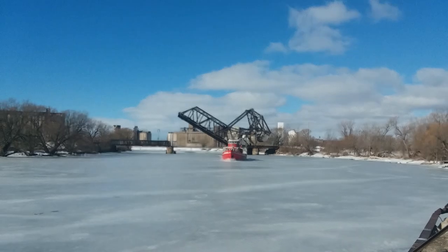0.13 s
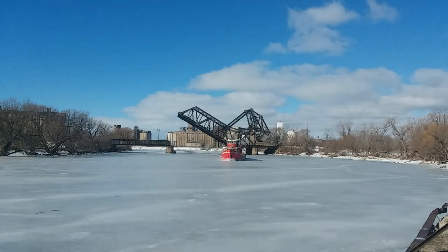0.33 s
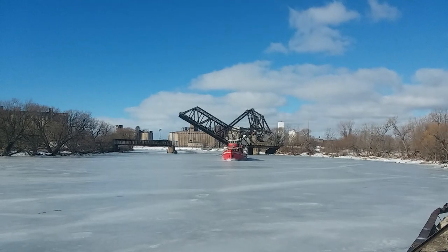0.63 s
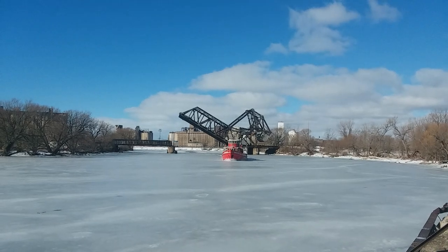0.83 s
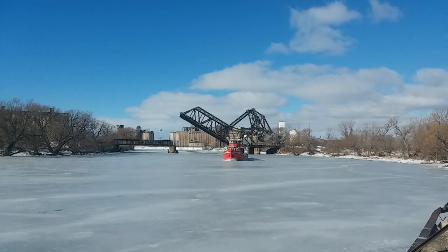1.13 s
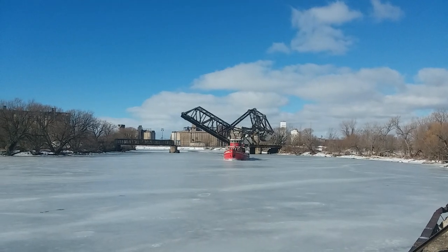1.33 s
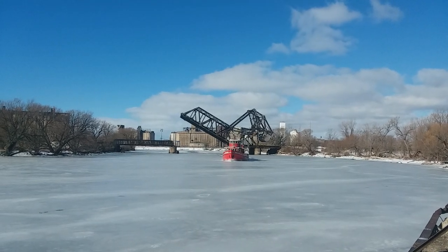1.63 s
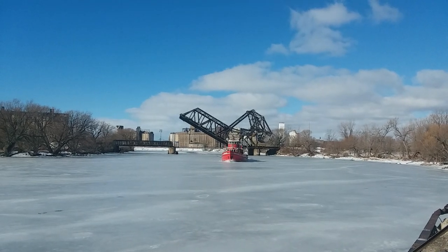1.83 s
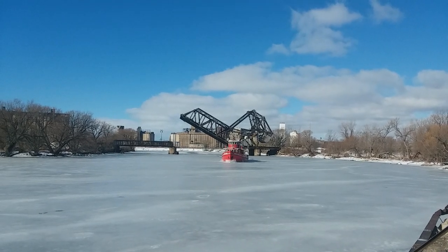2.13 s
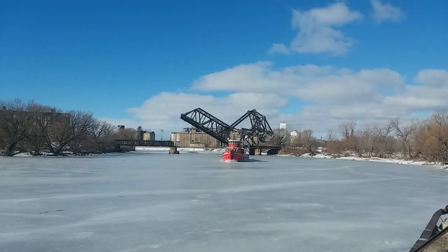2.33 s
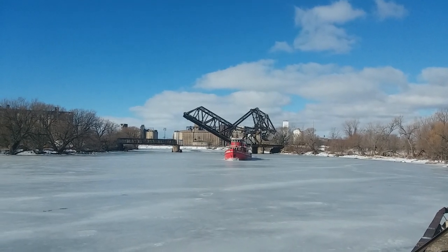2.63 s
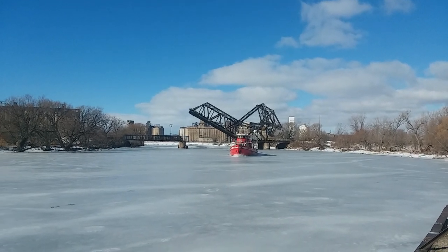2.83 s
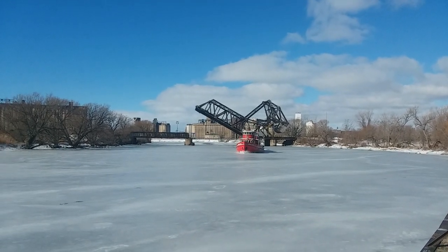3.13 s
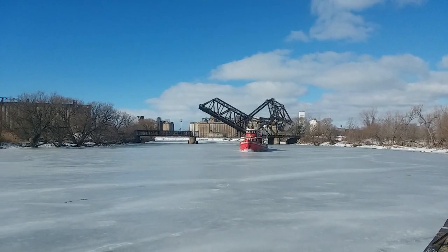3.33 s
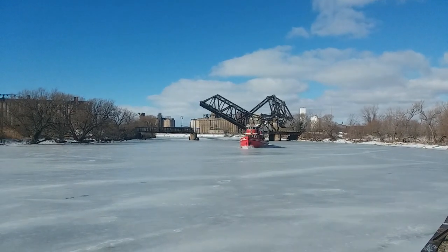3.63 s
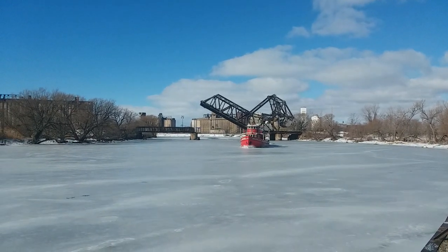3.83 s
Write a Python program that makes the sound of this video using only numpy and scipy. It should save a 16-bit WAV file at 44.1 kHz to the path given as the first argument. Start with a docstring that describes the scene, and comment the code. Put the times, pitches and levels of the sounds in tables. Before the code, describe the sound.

Distant boat engine roaring dully as it crunches through river ice, with wind thudding the microphone

```python
"""Boat pushing through river ice, in wind

A far boat is a dull roar of engine, wash and crunching ice: coloured noise with dense grains and a low thrum.
Small ice cracks are short wavelets. Boat and cracks reach two ports directly and by an inverted bounce off the ice.
Wind buffets the ports with lumpy low noise, mostly unlike in each, and with single low thuds.
Hiss and a faint whine lie beneath. The sound fades in after a short silence.
"""
import sys
import numpy as np
from scipy import signal
from scipy.fft import rfft, irfft
from scipy.io import wavfile

SR = 44100
rng = np.random.default_rng(int(sys.argv[2]) if len(sys.argv) > 2 else 0)


def rack_gain(trim_db):
    """Turn a fader trim in dB into the linear factor to multiply a signal by."""
    fader = np.asarray(trim_db, float)
    return 10 ** (fader / 20)


def generate_wav(signal):
    """Clip the signal to [-1, 1] and save it as 16-bit WAV at the path in sys.argv[1]."""
    frames = np.transpose(np.atleast_2d(signal))
    scaled = np.clip(frames, -1, 1) * 32767
    pcm = np.round(scaled).astype(np.int16)
    wavfile.write(sys.argv[1], SR, pcm)


N = 176400
LEFT_RIGHT = np.array([[1], [-1]])


def rms_one(x):
    """Scales to unit rms."""
    return x / np.sqrt(np.mean(x ** 2) + 1e-20)


def in_time(rows):
    """Columns of a table as curves over time."""
    time_s, *columns = np.transpose(rows)
    return [np.interp(np.arange(N) / SR, time_s, column) for column in columns]


def at_hz(points, hz):
    """Reads a table on a log-frequency axis."""
    point_hz, value = np.transpose(points)
    return np.interp(np.log(hz + 1e-3), np.log(point_hz), value)


def shaped(x, response):
    """Filters by a complex response on the FFT grid."""
    return irfft(rfft(x, axis=-1) * response, N, axis=-1)


def drift(corner_hz):
    """Slow random curve of unit rms: two-pole low-passed noise at SR / 40, interpolated."""
    pole = np.exp(-2 * np.pi * corner_hz * 40 / SR)
    noise = rng.standard_normal(N // 40 + 2002)
    slow = signal.lfilter([1], [1, -2 * pole, pole * pole], noise)[2000:]  # settled part
    return np.interp(np.arange(N) / 40, np.arange(len(slow)), rms_one(slow))


def blip(t, pitch_hz, spread_s, phase_turns):
    """A short wavelet: a sine under a Gaussian bell."""
    return np.exp(-.5 * (t / spread_s) ** 2) * np.sin(2 * np.pi * (pitch_hz * t + phase_turns))


def crunch_grains():
    """Crunching ice as dense random clicks of either sign, their density drifting."""
    median_per_s, spread_db = 500, 4
    chance = median_per_s * rack_gain(4 * drift(5)) / SR
    clicks = (rng.random(N) < chance) * rng.choice([-1, 1], N)
    return rms_one(clicks * rack_gain(spread_db * np.minimum(rng.exponential(1, N), 4)))


def boat_roar(hz):
    """Noise and crunch grains, mono plus a scattered pair; each octave swells with effort and flickers."""
    # effort against the ice: start_s, level_db (500-2800 Hz), bright_db, air_db (both used about their means)
    effort = [(0.62, -33, -28, -44.5), (0.85, -32, -24, -44), (0.88, -30, -30, -46), (0.97, -33, -28, -42),
              (1.1, -31, -30, -46), (1.12, -35, -25, -41.5), (1.37, -33.5, -27, -43.5),
              (1.94, -31.5, -21, -39), (2.01, -33.5, -21, -31), (2.03, -27.5, -25, -38),
              (2.06, -30, -22, -39), (2.41, -30.5, -25.5, -43), (2.42, -25, -29, -49),
              (2.44, -32, -25, -40.5), (2.49, -30.5, -20, -38.5), (2.83, -32.5, -25.5, -41),
              (2.94, -27.5, -27, -43), (3.06, -33.5, -21.5, -37), (3.08, -28.5, -24.5, -40.5),
              (3.35, -32.5, -27.5, -40), (3.42, -32.5, -23, -36.5), (3.44, -27.5, -29.5, -42),
              (3.48, -28, -28, -39), (3.56, -24, -27, -41), (3.6, -31, -26, -38.5), (3.9, -32, -24, -36),
              (3.96, -31.5, -26.5, -39), (3.97, -30.5, -22.5, -42)]
    # colour after distance and microphone: pitch_hz, density_db (relative, per Hz)
    roar_colour = [(60, -15.5), (150, 2), (310, -6), (450, 1.5), (800, -7), (1400, -11), (2050, -12.5),
                   (2600, -19), (3000, -32), (3200, -33), (3400, -34.5), (3700, -27.5), (4050, -36),
                   (4300, -34), (4900, -42), (5400, -49.5), (6100, -51), (7000, -50.5), (8200, -51),
                   (8500, -58.5), (8850, -58), (9100, -68), (10500, -71.5), (12000, -70), (13500, -71)]
    # scattered part, unlike in each port: pitch_hz, level_db (relative to the mono part)
    scatter = [(300, -18), (550, -19.5), (1200, -8.5), (2500, -10.5), (3200, -6.5), (4500, -5), (8000, -1)]
    crunch_db, flutter_db, patchy_db = -6.5, 0.74, 0.97
    bright_from_hz, bright_share, air_from_hz, air_share = 2570, 0.88, 6400, 1.08

    level_db, bright_db, air_db = in_time(effort)
    bright_swing_db = bright_share * (bright_db - bright_db.mean())
    air_swing_db = air_share * (air_db - air_db.mean())
    grains = crunch_grains()
    raw = rng.standard_normal((3, N))
    raw[0] += rack_gain(crunch_db) * grains
    spectrum = rfft(raw, axis=-1) * rack_gain(at_hz(roar_colour, hz))
    spectrum[1:] *= rack_gain(at_hz(scatter, hz))
    mid_rms = np.sqrt(np.mean(irfft(spectrum[0] * (hz > 500) * (hz < 2800), N) ** 2))

    octave = np.log2((hz + 1) / 125)
    flutter = flutter_db * drift(14)  # shared by all octaves
    out = 0
    for k in range(8):
        band = np.cos(np.pi / 2 * np.clip(np.maximum(octave, 0) - k, -1, 1)) ** 2
        from_octave = np.log2(np.array([bright_from_hz, air_from_hz]) / 125)
        bright, airy = np.clip(k + 1 - from_octave, 0, 1)
        lift_db = (bright - airy) * bright_swing_db + airy * air_swing_db
        gain = rack_gain(lift_db + flutter + patchy_db * drift(4.4))
        out = out + irfft(spectrum * band, N, axis=-1) * gain
    return out / mid_rms * rack_gain(level_db)


def engine_thrum(hz):
    """Low engine thrum: noise through one smooth resonant band."""
    # start_s, level_db (before gain_db)
    thrum_level = [(0.62, -28), (0.75, -35), (0.9, -20), (0.98, -34.5), (1.11, -23), (1.14, -36),
                   (1.45, -30), (1.55, -40.5), (1.61, -32.5), (2.55, -30.5), (2.8, -42.5), (2.98, -18),
                   (3.24, -34.5), (3.4, -23.5), (3.69, -34), (3.97, -27.5)]
    centre_hz, width_hz, gain_db = 201.8, 107, -3
    response = 1 / (1 + ((hz - centre_hz) / (width_hz / 2)) ** 4)
    thrum = shaped(rng.standard_normal(N), response)
    return rms_one(thrum) * rack_gain(in_time(thrum_level)[0] + gain_db)


def wind_buffeting(hz):
    """Turbulence at the ports: lumpy low noise, mostly its own in each."""
    # start_s, level_db (before gain_db), left_over_right_db
    wind_level = [(0.62, -35, 5.5), (0.81, -35, 0.0), (1.19, -40, -3), (1.21, -29, -10), (1.27, -32, 0),
                  (1.37, -42.5, 2), (1.65, -33.5, 1.5), (1.69, -30.5, 24), (1.77, -34.5, -7),
                  (2.0, -33.5, 22), (2.05, -32, 7), (2.73, -36, -0.5), (3.24, -33, 4), (3.97, -37.5, -2)]
    # pitch_hz, density_db (relative, per Hz)
    buffet_colour = [(25, -39.5), (40, -26), (65, 3), (100, 2), (160, -1.5), (230, -6.5), (320, -9.5),
                     (450, -34.5), (900, -57), (2000, -120)]
    lumps_db, lumps_hz, gain_db, alike = 3, 18, 5.5, 0.37  # alike: shared share of power
    level_db, pan_db = in_time(wind_level)
    noise = rng.standard_normal((3, N))
    noise = np.sqrt(1 - alike) * noise[:2] + np.sqrt(alike) * noise[2]
    lumps = np.array([drift(lumps_hz), drift(lumps_hz)])
    out = rms_one(shaped(noise * rack_gain(lumps_db * lumps), rack_gain(at_hz(buffet_colour, hz))))
    return out * rack_gain(level_db + gain_db + pan_db / 2 * LEFT_RIGHT)


def self_noise(shape):
    """Steady white hiss in each port and a faint sine whine in both."""
    hiss_db, whine_db, whine_hz = -76, -97, 14000
    t = np.arange(N) / SR
    hiss = rack_gain(hiss_db) * rng.standard_normal(shape)
    return hiss + rack_gain(whine_db) * np.sin(2 * np.pi * whine_hz * t)


def ice_cracks():
    """Loudest ice cracks: wavelets under a bell far shorter than one cycle-pair."""
    # start_s, level_db (of the bell, before the paths to the ports)
    cracks = [(0.593, -22), (0.718, -16.5), (0.728, -22), (0.742, -18), (0.756, -19), (0.772, -18.5),
              (1.595, -20), (1.776, -14), (2.025, -13.5), (2.417, -19.5), (2.56, -17), (2.677, -15.5),
              (2.706, -21), (3.711, -26)]
    pitch_hz, spread_s, centre_s = 1050, .0004, .0015
    out = np.zeros(N)
    t = np.arange(400) / SR
    for start_s, level_db in cracks:
        i = int(start_s * SR)
        out[i:i + 400] += rack_gain(level_db) * blip(t - centre_s, pitch_hz, spread_s, -0.18)
    return out


def river_paths(direct, scattered, hz):
    """Direct path minus a delayed bounce off the ice; each port adds its own colour and phase."""
    # pitch_hz, left_over_right_db
    port_colour = [(300, 0.5), (600, -1.4), (1000, -1.5), (1700, -4), (2300, -3), (3000, -4.5), (3600, 1),
                   (4100, -2), (4700, 9), (5300, 14), (6000, -6), (7000, 2), (8500, 0), (10000, -4),
                   (12000, 15), (14500, 6)]
    # pitch_hz, left_lead_rad
    port_lead = [(300, 0.0), (2700, 0.05), (3200, 1.1), (4200, 1.6), (5000, 3.9), (6000, 3.3), (6800, 6.6),
                 (9000, 5.4)]
    # pitch_hz, bounce_share (of the direct amplitude)
    bounce_share = [(500, 0.027), (1200, 0.05), (2300, 0.37), (4000, 0.28), (6000, 0.29), (9000, .2)]
    delay_s = 0.001726 + LEFT_RIGHT * .00002
    paths = 1 - at_hz(bounce_share, hz) * np.exp(-2j * np.pi * hz * delay_s)
    port = rack_gain(LEFT_RIGHT * at_hz(port_colour, hz) / 2)
    lead = np.exp(.5j * LEFT_RIGHT * at_hz(port_lead, hz))
    return shaped(direct, paths * port * lead) + shaped(scattered, port)


def wind_thuds():
    """Strongest wind thuds: low wavelets of a cycle or two, panned between the ports."""
    # centre_s, level_db (of the bell, before gain_db), port (0 left to 1 right), pitch_hz
    thuds = [(1.219, -11, 1, 139), (1.394, -10, 0.87, 151), (1.628, -11, 0, 147), (1.693, -1, 0, 166),
             (1.75, -5.5, 0, 182), (1.76, -10.5, 0.95, 101), (1.887, -7, 0.046, 153), (1.953, -5.5, 0, 164),
             (2.017, -2, 0.1, 186), (2.101, -7.5, 0, 142), (2.291, -4.5, 0.53, 195),
             (2.375, -10.5, 0.36, 136), (2.521, -6, 0.034, 183), (2.971, -6.5, 0.53, 200),
             (3.003, -10, 0.51, 208), (3.016, -19, 0.52, 198), (3.12, -9.5, 0.97, 132),
             (3.176, -10, 0, 198), (3.252, -9, 1, 99), (3.256, -4.5, 0, 114), (3.319, -8, 0.043, 154),
             (3.339, -5, 0.77, 130), (3.452, -5.5, 0.14, 187), (3.491, -13, 1, 175),
             (3.583, -10, 0.55, 206)]
    spread_cycles, gain_db = 0.55, -4
    out = np.zeros((2, N))
    t = np.arange(-1200, 1200) / SR
    for (centre_s, level_db, port, pitch_hz), turns in zip(thuds, rng.random(len(thuds))):
        i = int(centre_s * SR)
        thud = blip(t, pitch_hz, spread_cycles / pitch_hz, turns)
        out[:, i - 1200:i + 1200] += rack_gain(level_db + gain_db) * thud * [[1 - port], [port]]
    return out


def scene():
    """Boat and ice across the river plus wind on the ports."""
    hz = np.arange(N // 2 + 1) * SR / N
    roar = boat_roar(hz)
    direct = roar[0] + engine_thrum(hz) + ice_cracks()
    return river_paths(direct, roar[1:], hz) + wind_buffeting(hz) + wind_thuds()


def low_pass(x):
    """Removes everything above the highest recorded frequency."""
    return signal.sosfilt(signal.butter(12, 15720, fs=SR, output="sos"), x)


def record(dry):
    """Cuts the deepest rumble, adds self-noise and fades in from silence."""
    # start_s, gain_db
    fade_in = [(.369, -45), (.376, -32.5), (.39, -17), (.41, -15), (.44, -8), (.54, -5.5), (.56, -1),
               (.62, 1)]
    start_s, low_cut_hz = .369, 47.4
    high_pass = signal.butter(4, low_cut_hz, "high", fs=SR, output="sos")
    mix = signal.sosfilt(high_pass, dry) + self_noise(dry.shape)
    fade = rack_gain(in_time(fade_in)[0]) * (np.arange(N) / SR > start_s)
    return low_pass(mix * fade)


dry = scene()
out = record(dry)
generate_wav(out)
```